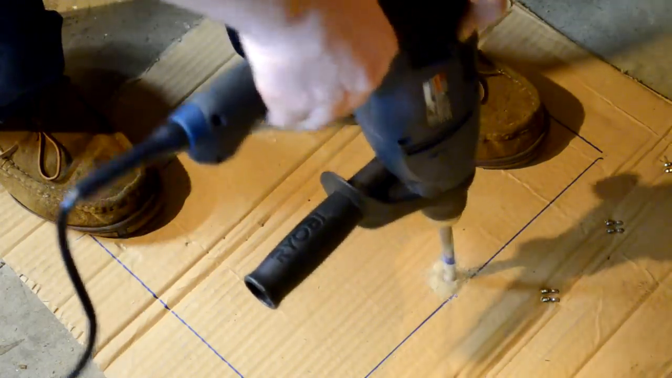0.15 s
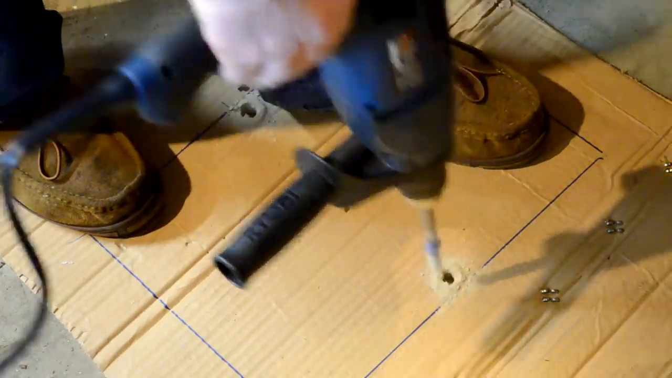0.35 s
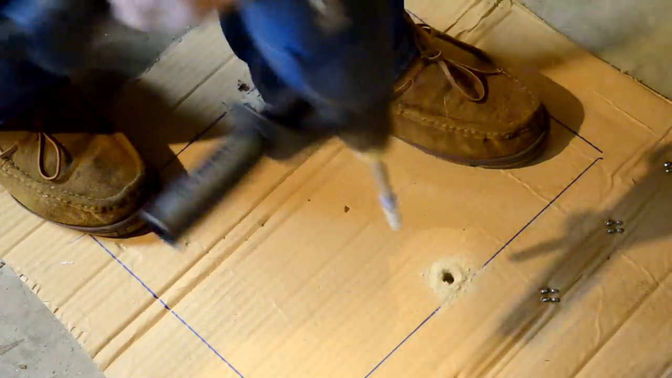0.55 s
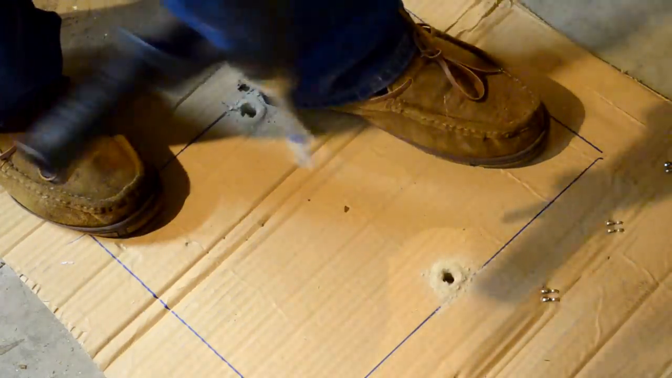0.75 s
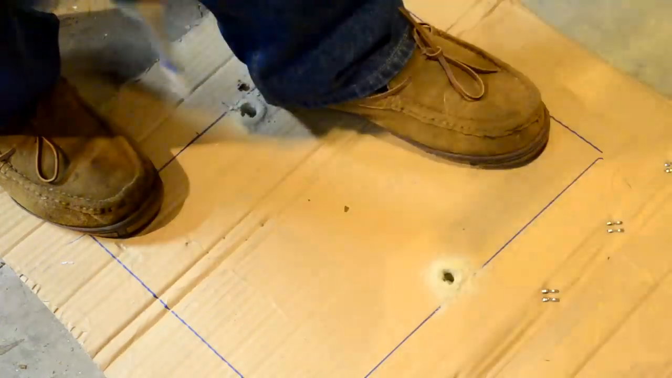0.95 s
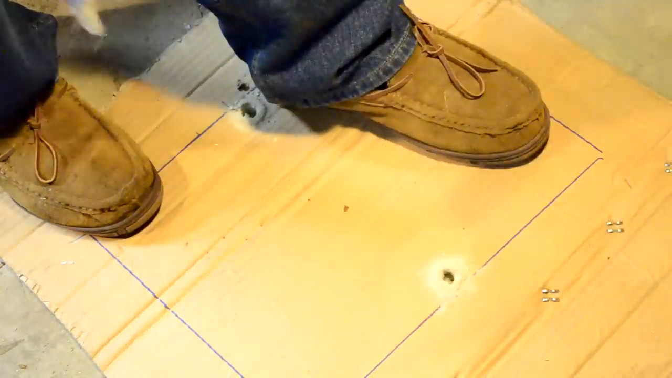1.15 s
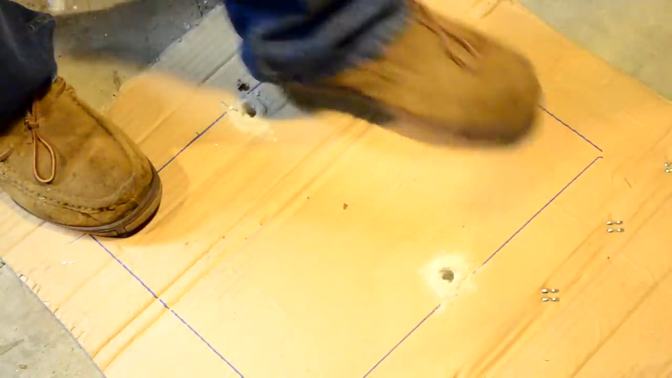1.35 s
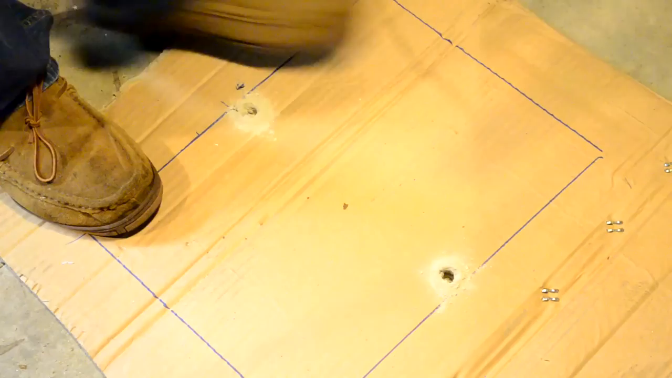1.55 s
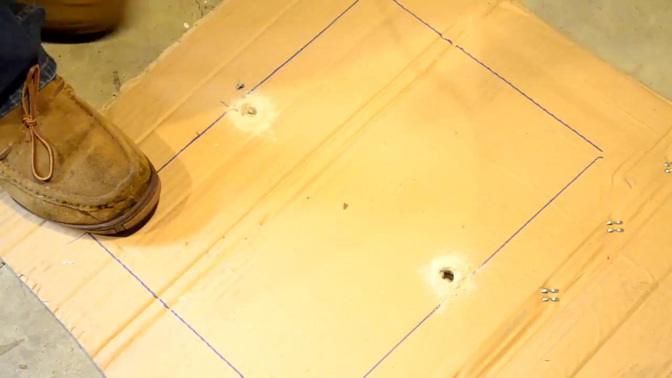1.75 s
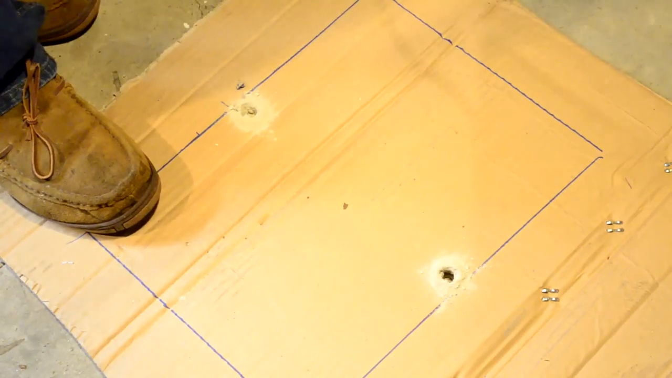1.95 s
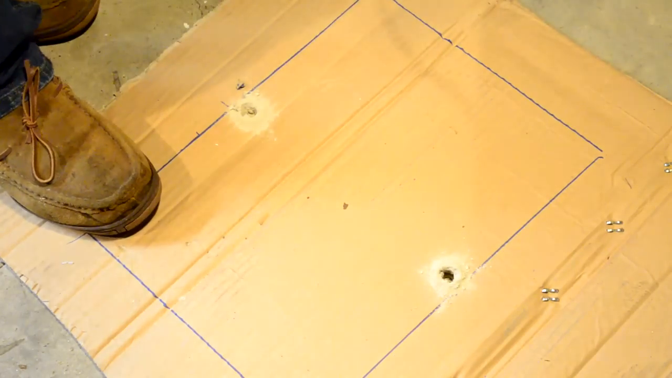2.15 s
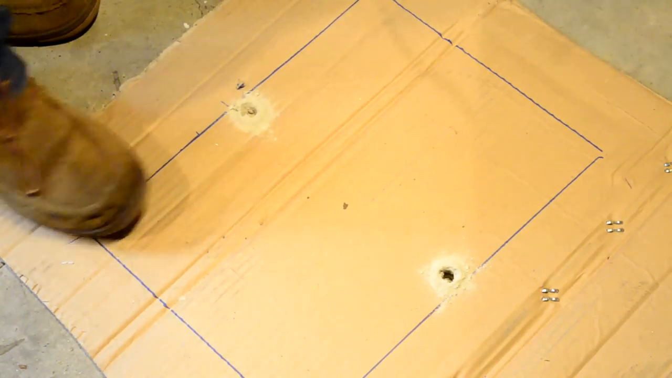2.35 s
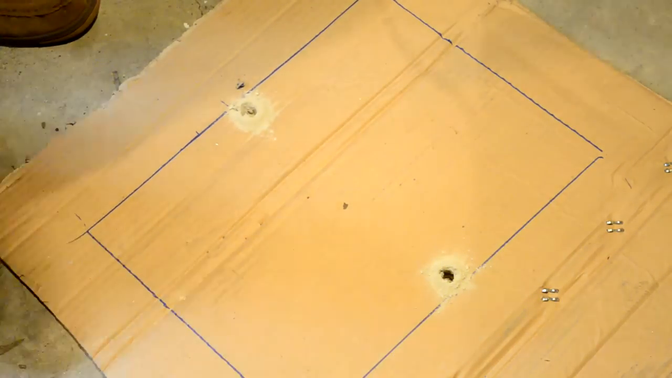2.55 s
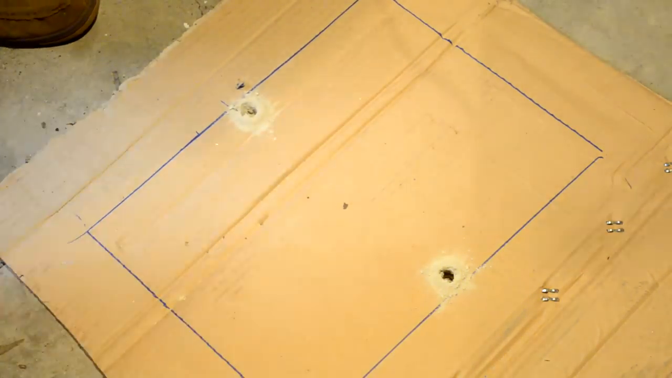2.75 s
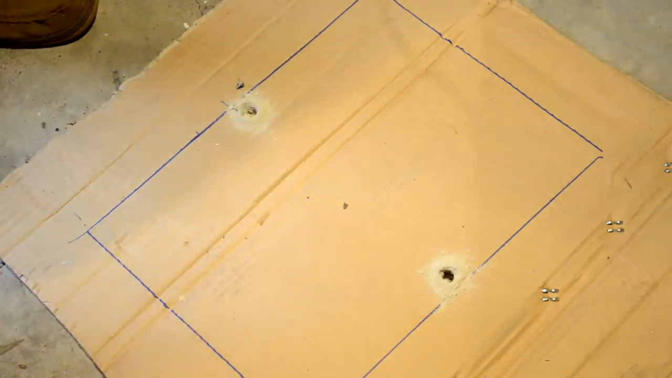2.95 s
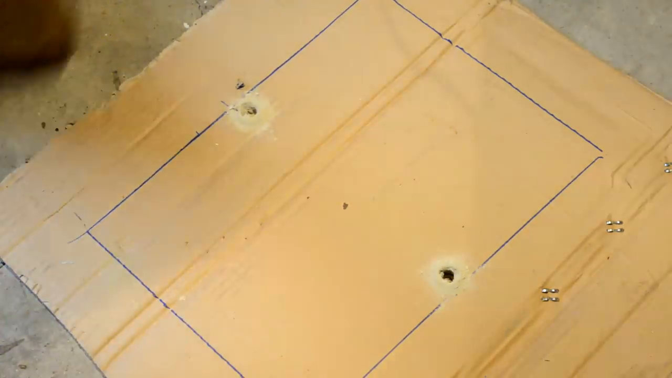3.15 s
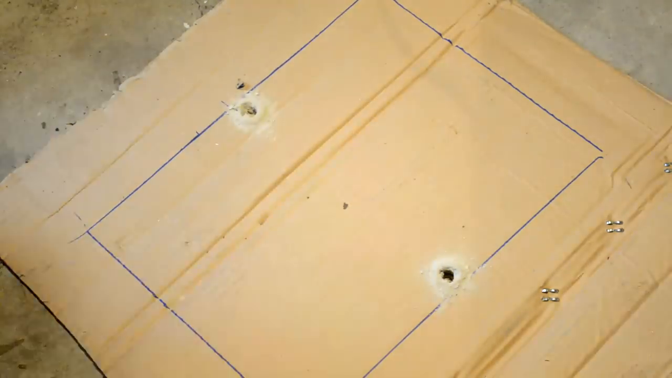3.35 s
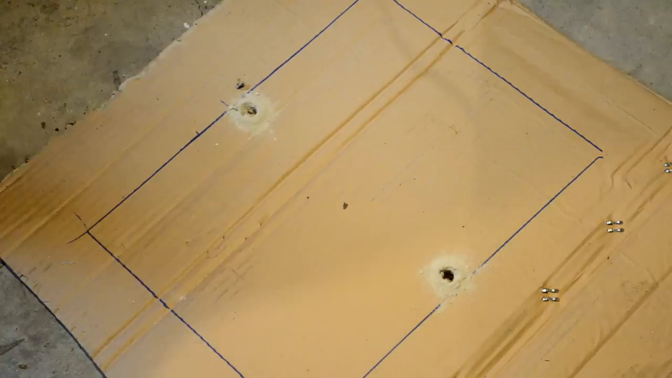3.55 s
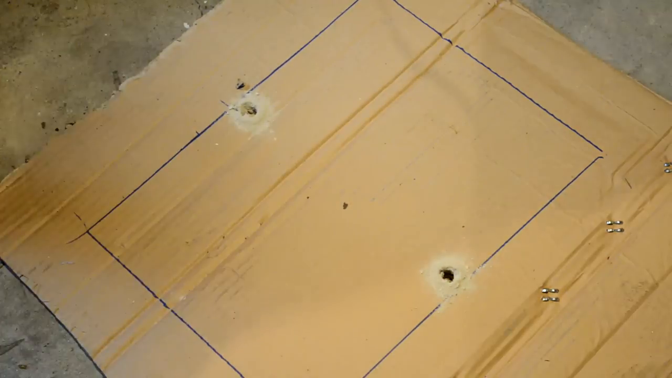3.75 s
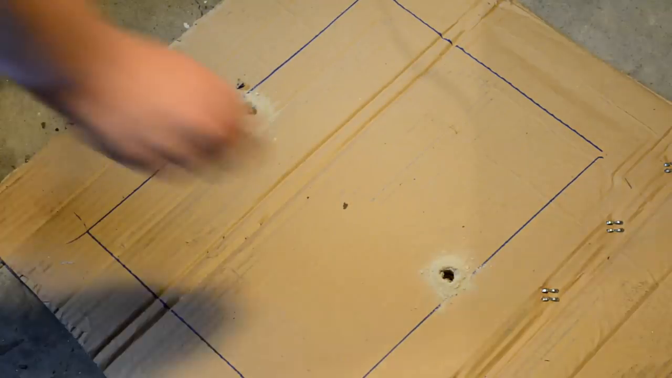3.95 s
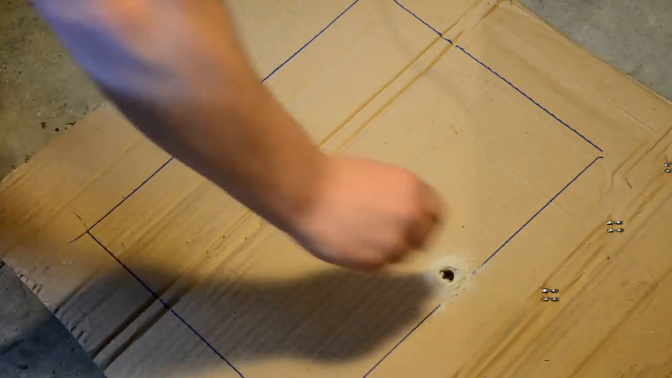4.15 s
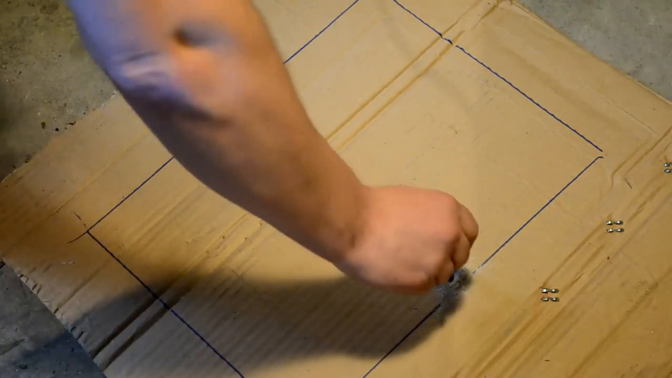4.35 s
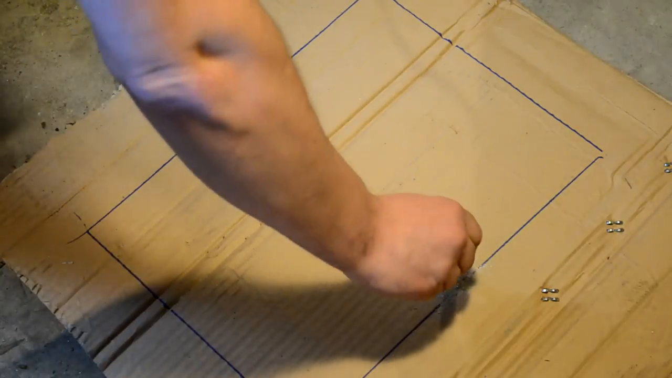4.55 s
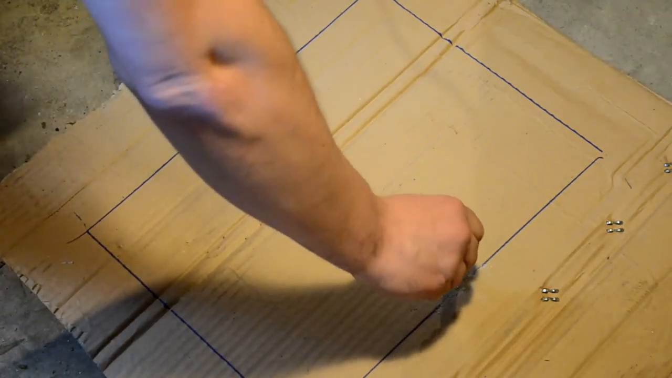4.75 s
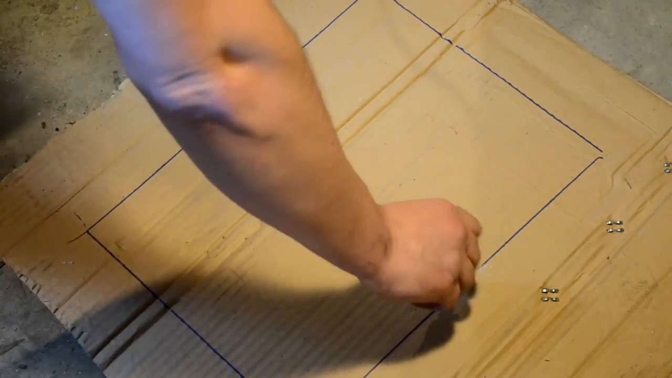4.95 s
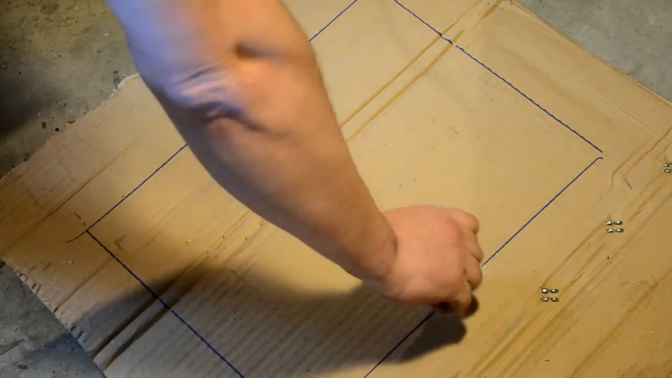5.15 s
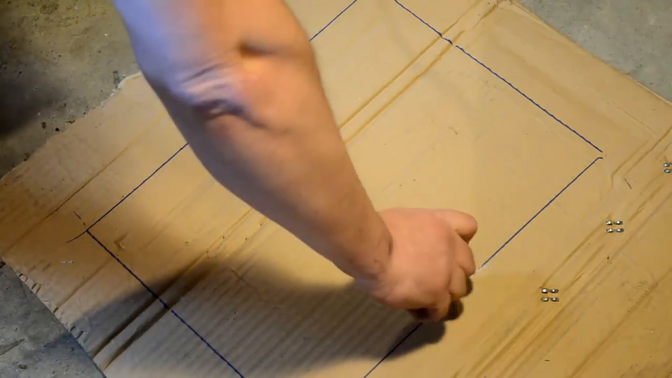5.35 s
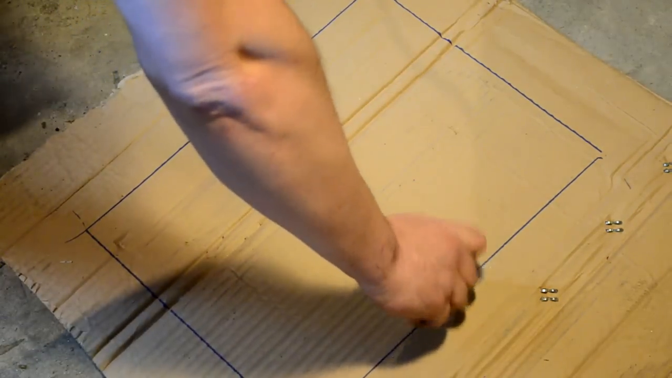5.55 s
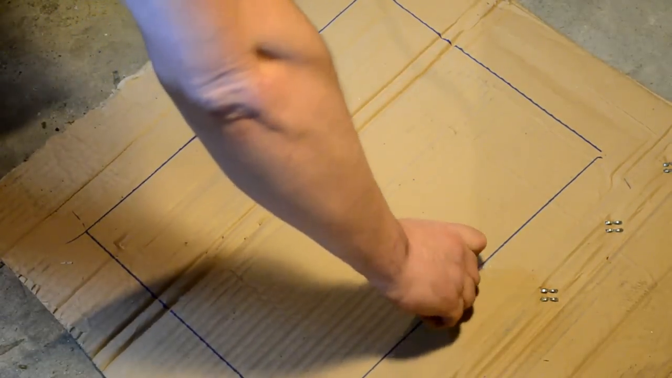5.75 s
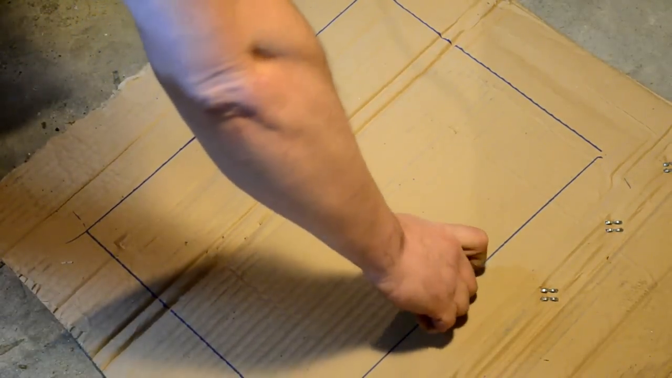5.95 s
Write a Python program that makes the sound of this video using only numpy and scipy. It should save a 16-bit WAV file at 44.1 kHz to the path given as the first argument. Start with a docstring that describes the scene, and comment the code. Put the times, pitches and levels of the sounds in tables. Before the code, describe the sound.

Sinking whine and gear rattle of a drill coasting to rest, soft footfalls on a cardboard sheet, then short scratchy finger strokes.

```python
"""A corded drill is let go, lifted from its hole in a concrete floor and coasts to a stop: rotor speed drives
gear rattle (noise burst per tooth), fan rush (noise) and the sinking commutator whine (sines).
Shoes shuffle on a cardboard sheet (damped thumps, resonant knocks, scuffs, squeaks); clothes rustle (noise);
then fingers brush the dust round the hole (grainy noise through the sheet's resonances).
Steady sines and dark noise make the mains hum and still air of the small workshop."""
import sys
import numpy as np
from scipy import signal
from scipy.io import wavfile
from scipy.ndimage import uniform_filter1d

SR = 44100
rng = np.random.default_rng(int(sys.argv[2]) if len(sys.argv) > 2 else 0)


def waveform_to_disk(signal):
    """Save audio, clipped to [-1, 1], as 16-bit WAV at the path in sys.argv[1]."""
    frames = np.transpose(np.atleast_2d(signal))
    scaled = np.clip(frames, -1, 1) * 32767
    samples = np.round(scaled).astype(np.int16)
    wavfile.write(sys.argv[1], SR, samples)


N = 264159
TIME = np.arange(N) / SR
CUTOFF_HZ = 15650


def from_db(db):
    """Decibels to gain."""
    return 10 ** (np.asarray(db) / 20)


def rms_one(x):
    """Scale to unit power."""
    return x / np.sqrt(np.mean(x ** 2) + 1e-20)


def drift(rate_hz):
    """Slow random wander, spread 1: twice low-passed noise, computed at every 40th sample."""
    step = 40
    r = np.exp(-2 * np.pi * rate_hz * step / SR)
    white = rng.standard_normal(N // step + 2002)
    slow = signal.lfilter([1], [1, -2 * r, r * r], white)[2000:]  # skip the filter's start
    return np.interp(np.arange(N) / step, np.arange(len(slow)), rms_one(slow))


def band(x, low_hz, high_hz):
    """Butterworth band-pass."""
    edges_hz = [low_hz, min(high_hz, .45 * SR)]
    return signal.sosfilt(signal.butter(2, edges_hz, "band", fs=SR, output="sos"), x + 1e-18)


def high_pass(x, hz, order):
    """Butterworth high-pass."""
    return signal.sosfilt(signal.butter(order, hz, "high", fs=SR, output="sos"), x + 1e-18)


def coloured_noise(spectrum):
    """Roughly third-octave noise bands laid along a spectrum; rms 1."""
    hz, db = np.transpose(spectrum)
    edge_count = int(3 * np.log2(hz[-1] / hz[0])) + 3
    edges_hz = np.geomspace(max(hz[0], 15), min(hz[-1], 17000), edge_count)
    white = rng.standard_normal((2, N))  # neighbouring bands take different noise
    out = np.zeros(N)
    for k, (low, high) in enumerate(zip(edges_hz, edges_hz[1:])):
        band_db = np.interp(np.log(low * high) / 2, np.log(hz), db)
        out += from_db(band_db) * band(white[k % 2], low, high)
    return rms_one(out)


def body(x, peaks, direct_db):
    """Resonances standing out of a broad response, at unchanged power."""
    out = from_db(direct_db) * x
    for hz, width_hz, db in peaks:
        r = np.exp(-np.pi * width_hz / SR)
        zeros = np.array([1, 0, -1]) * (1 - r * r) / 2
        poles = [1, -2 * r * np.cos(2 * np.pi * hz / SR), r * r]
        out = out + from_db(db) * signal.lfilter(zeros, poles, x)
    return rms_one(out) * np.std(x)


def bursts(hits, spread_db, decay_s, bed):
    """Envelope of uneven little impacts over a steady bed; power levelled to about 1."""
    sizes = hits * from_db(spread_db * np.clip(rng.standard_normal(N), -2, 2))
    power = signal.lfilter([1], [1, -np.exp(-2 / (decay_s * SR))], sizes ** 2 + 1e-18)
    levelled = power / (uniform_filter1d(power, size=6000) + 1e-9)
    return np.sqrt((levelled + bed) / (1 + bed))


def swell(start_s, length_s, attack_s, t60_s):
    """Rise, hold until the length is over, then fall 60 dB per t60."""
    late_s = TIME - start_s
    rise = np.clip(late_s / max(attack_s, .001), 0, 1)
    return rise * from_db(-60 * np.clip((late_s - length_s) / t60_s, 0, 3))


def swells(rows, t60_s):
    """Joint envelope, summed in power, of events that share one release."""
    return np.sqrt(sum((from_db(db) * swell(s, length_s, attack_s, t60_s)) ** 2
                       for s, length_s, db, attack_s in rows))


# hum partials: f/Hz, level/dB
HUM = [(107.7, -94.5), (597.5, -73), (721.4, -66.5), (899.0, -84), (1200, -82), (1443, -80.5)]
# still air: f/Hz, relative density/dB per Hz
AMBIENCE = [(15, -43.5), (25, -13), (43, -12), (233, -10), (495, -12.5), (598, -13.5), (648, -15),
            (722, 5.5), (782, -9.5), (1450, -14), (2290, -20), (2620, -20), (5730, -38), (12200, -39),
            (15500, -59)]
AMBIENCE_DB = -63.5
LOW_HUM_DB, LOW_HUM_HZ = -75.5, 110.4


def background():
    """Still air, slightly wavering mains hum and a soft low hum that swells for a moment."""
    out = from_db(AMBIENCE_DB) * coloured_noise(AMBIENCE)
    for hz, db in HUM:
        level = np.sqrt(2) * from_db(db + 0.53 * drift(3.6))
        out += level * np.sin(2 * np.pi * hz * TIME + 0.16 * drift(5))
    low_hum = np.sqrt(2) * np.sin(2 * np.pi * LOW_HUM_HZ * TIME + 0.57 * drift(5.8))
    envelope = swell(start_s=4.2, length_s=.56, attack_s=0.066, t60_s=.4)
    return out + from_db(LOW_HUM_DB) * envelope * low_hum


def slide():
    """Pressure of a sole sliding back over the cardboard."""
    return swell(start_s=2.73, length_s=0.43, attack_s=0.2, t60_s=.6)


# cloth moves: start t/s, length/s, level/dB, attack/s
RUSTLES = [(1.95, 0.49, -70.5, 0.053), (2.6, 0.21, -62, 0.1), (2.88, 0.59, -68.5, 0.073),
           (3.55, 0.54, -64, 0.44), (3.85, 0.44, -63, .19)]
# cloth: f/Hz, relative density/dB per Hz
SLEEVE = [(590, -40), (1000, -1.5), (1410, -0.5), (1640, -2), (1730, -1), (1840, -1), (6330, -19.5),
          (12200, -25.5), (14100, -26), (15500, -39)]
RUSTLE_T60_S, SLIDE_HISS_DB = 0.63, -62


def clothes():
    """Cloth and a sole slide as the body turns and the arm reaches down: noise in fine folds."""
    folds = bursts(rng.random(N) < 300 / SR, spread_db=9.0, decay_s=0.0017, bed=3.0)
    cloth = swells(RUSTLES, RUSTLE_T60_S) * coloured_noise(SLEEVE)
    hiss = rms_one(band(rng.standard_normal(N), 1340, 1600))
    return folds * (cloth + from_db(SLIDE_HISS_DB) * slide() * hiss)


# sole and sheet: start t/s, length/s, start f/Hz, end f/Hz, reference level/dB (peak about 12 dB above)
SQUEAKS = [(3.217, 0.028, 756, 790, -54), (3.815, 0.0082, 1720, 1710, -50.5),
           (4.64, 0.027, 900, 950, -65.5)]


def squeaks():
    """Brief stick-slip chirps, gliding a little."""
    out = np.zeros(N)
    for s, length_s, start_hz, end_hz, db in SQUEAKS:
        along = np.clip((TIME - s) / length_s, 0, 1)
        phase = 2 * np.pi * np.cumsum(start_hz + (end_hz - start_hz) * along) / SR
        envelope = np.interp(along, [0, .08, .6, 1], [0, 4.0, 2.0, 0.036])
        out += from_db(db) * envelope * (np.sin(phase) + 0.075 * np.sin(2 * phase))
    return out


# cardboard resonances: f/Hz, width/Hz, relative level/dB
SHEET_MODES = [(290, 130, -14), (384, 100, -0.5), (565, 28, 11), (916, 23, 6), (1075, 34, 9),
               (1180, 100, -4), (1494, 120, -2), (1586, 72, -1), (1920, 34, -15.5), (2980, 230, -1),
               (3430, 150, -17), (3800, 130, -1)]


def cardboard(x, direct_db):
    """The sheet resonates under whatever touches it."""
    return body(x, SHEET_MODES, direct_db)


# finger strokes: start t/s, length/s, level/dB, attack/s
STROKES = [(4.838, 0.041, -41.5, 0.026), (4.89, 0.04, -51.5, 0.0091), (4.944, 0.031, -46.5, 0.0036),
           (4.975, 0.049, -50, .015), (5.036, .014, -51, .008), (5.061, .008, -42.5, 0.0026),
           (5.084, 0.011, -46.5, .004), (5.126, .012, -52, .006), (5.174, 0.031, -47.5, 0.0086),
           (5.228, 0.0083, -37.5, 0.0065), (5.398, 0.0078, -48, 0.006), (5.571, 0.026, -33, 0.005),
           (5.703, .035, -43.5, 0.0054), (5.739, 0.046, -34, .004), (5.8, 0.05, -48.5, .01),
           (5.887, 0.016, -43.5, .005), (5.96, .04, -44.5, 0.027)]
# gritty shoe scuffs: start t/s, length/s, level/dB, attack/s
SCUFFS = [(1.825, 0.019, -55, .008), (2.195, 0.043, -69.5, 0.035), (2.36, 0.039, -67, 0.026),
          (3.232, 0.0096, -61.5, 0.009)]
# rubbed dust: f/Hz, relative density/dB per Hz
BRUSHING = [(71, -53), (120, -3), (312, -14.5), (390, -10.5), (508, -5), (586, -22), (676, -0.5),
            (1080, 1.5), (1620, -3), (2540, -12), (2810, -11.5), (3580, -20.5), (7760, -24.5), (13200, -39),
            (15500, -63)]
STROKE_T60_S, SCUFF_T60_S = 0.14, 0.1
SCUFF_GRIT_DB, SLIDE_RUB_DB = 20, -67


def strokes():
    """Concrete dust grains roll under each stroke or scuff and sound through the cardboard."""
    fingers = swells(STROKES, STROKE_T60_S)
    shoes = swells(SCUFFS, SCUFF_T60_S)
    push = fingers + shoes + from_db(SLIDE_RUB_DB) * slide()
    grit = fingers + from_db(SCUFF_GRIT_DB) * shoes  # treble is stronger under shoes
    grains = bursts(rng.random(N) < 450 / SR, spread_db=1.5, decay_s=0.0018, bed=0.8)
    rub = high_pass(cardboard(grains * coloured_noise(BRUSHING), direct_db=3.0), hz=126, order=4)
    dull = signal.sosfilt(signal.butter(1, 3000, fs=SR, output="sos"), rub)
    return push * dull + grit * (rub - dull)


def knocks(rows, t60_s, fall_db_per_octave):
    """Contact = sharp click + short shudder, in five registers weakening away from its centre."""
    out, t = np.zeros(N), TIME[:SR // 4]
    registers_hz = [(160, 440), (380, 1040), (1200, 1850), (2900, 4100), (5000, 10000)]
    for s, db, centre_hz in rows:
        shudder = rng.standard_normal(len(t)) * from_db(-60 * t / t60_s)
        shudder[0] += 12.5  # click
        start = round(s * SR)
        for low, high in registers_hz:
            part = band(shudder, low, high)
            part /= np.std(part[:SR // 50])
            octaves = abs(np.log2(np.sqrt(low * high) / centre_hz))
            level = from_db(db - fall_db_per_octave * octaves)
            out[start:start + len(t)] += (level * part)[:N - start]
    return high_pass(cardboard(out, direct_db=5.5), hz=113, order=2)


# contacts: t/s, level/dB, centre f/Hz (higher = harder)
TAPS = [(1.999, -60.5, 4500), (2.2, -69, 6500), (2.324, -69, 8000), (2.548, -58, 1200), (2.774, -55, 3400),
        (3.377, -67, 3000), (3.46, -58.5, 1400), (3.61, -61, 3080), (3.816, -46.5, 1840), (3.839, -52, 210),
        (3.891, -46.5, 970), (3.949, -55, 1210), (3.971, -41.5, 386), (4.193, -36, 910), (4.194, -52, 3550),
        (4.758, -57.5, 800), (5.241, -42, 1446), (5.374, -42, 670), (5.514, -48.5, 750),
        (5.571, -41.5, 400), (5.74, -46.5, 540)]


def taps():
    """Fingers, shoes and crumbs of concrete tap the cardboard."""
    return knocks(TAPS, t60_s=0.098, fall_db_per_octave=12)


# shoes set down: t/s, thump level/dB, ring f/Hz, sheet knock level/dB
FOOTFALLS = [(1.014, -27.5, 202, -48), (1.826, -35.5, 167.4, -43), (1.885, -45, 153, -50),
             (2.894, -37, 250, -46.5), (2.969, -42, 153, -48)]
FOOT_KNOCK_HZ, THUMP_T60_S = 620, 0.062


def footfalls():
    """Soft sole knocks the sheet and drives air from under it: low damped thump with two overtones."""
    contacts = [(s, knock_db, FOOT_KNOCK_HZ) for s, _, _, knock_db in FOOTFALLS]
    out = knocks(contacts, t60_s=0.21, fall_db_per_octave=8.5)
    for s, db, hz, _ in FOOTFALLS:
        t = np.maximum(TIME - s, 0)
        thump = (1 - np.exp(-t / 0.0056)) * from_db(np.maximum(db - 60 * t / THUMP_T60_S, -200))
        ring = np.sin(2 * np.pi * hz * t)
        ring += 0.67 * np.sin(2 * np.pi * 1.42 * hz * t)
        ring += np.sin(2 * np.pi * 2.33 * hz * t)
        out += thump * ring
    return out


STOP_S, FRICTION_HZ_PER_S = 1.9911, 123.33
DRAG_HZ = 306.79  # speed at which air drag equals friction


def rotor_speed():
    """Turns per second under constant friction and air drag (square of the speed)."""
    return DRAG_HZ * np.tan(np.maximum(STOP_S - TIME, 0) * FRICTION_HZ_PER_S / DRAG_HZ)


def running(spectrum, speed, full_db, power, slack_db):
    """Noise that falls with a power of the speed, down to the rattle of loose parts."""
    return np.hypot(from_db(full_db) * speed ** power, from_db(slack_db)) * coloured_noise(spectrum)


# low gear-case rumble, gears, housing: f/Hz, relative density/dB per Hz
RUMBLE = [(120, -34.5), (200, -18.5), (260, -9.5), (310, -14.5), (350, -2.5), (480, -3.5), (560, 2.5),
          (640, 1), (800, -26.5)]
GEARS = [(450, -23), (620, -7), (730, -2), (810, 0), (1100, 2.5), (1400, 2.5), (1730, -5), (2200, -21),
         (2860, -36)]
HOUSING = [(1060, -28.5), (1800, 2), (2290, -2), (2480, 0.5), (2830, -2.5), (3120, 2.5), (3970, -12),
           (4310, -16), (4800, -14.5), (6240, -43), (10600, -120)]
# narrow peaks that colour the rattle: f/Hz, width/Hz, relative level/dB
RATTLE_PEAKS = [(385, 100, -3.5), (553, 22, -10.5), (670, 22, 1), (760, 28, -2), (934, 24, 0),
                (1067, 10, -5), (1124, 7.5, 2.5), (1114, 15, -1.5), (1326, 36, -8), (1443, 17, 1.5),
                (1577, 7.3, -7), (1800, 19, -19.5), (2370, 20, -8.5), (2435, 39, -4), (2860, 17, -7.5),
                (3100, 38, -13), (3985, 42, 10.5)]
BIT_OUT_S, BIT_CHATTER_DB, BIT_T60_S = .16, 1, 0.084


def gear_rattle(speed, teeth):
    """Unloaded teeth knock in their backlash, each differently; the bit chatters in its hole at first."""
    clatter = bursts(teeth, spread_db=3.0, decay_s=0.0021, bed=0.91)
    rattle = running(RUMBLE, speed, full_db=-32, power=1.57, slack_db=-68.5)
    rattle += running(GEARS, speed, full_db=-16.5, power=1.984, slack_db=-46.5)
    rattle += running(HOUSING, speed, full_db=-20.5, power=1.96, slack_db=-44.5)
    rattle *= from_db(BIT_CHATTER_DB * swell(0, BIT_OUT_S, 0, BIT_T60_S))
    return body(clatter * rattle, RATTLE_PEAKS, direct_db=4.5)


# fan: f/Hz, relative density/dB per Hz
FAN = [(2470, -28), (4200, 3.5), (4740, -2.5), (5340, 0), (5830, -2), (7210, -4), (8870, -3), (9950, -8.5),
       (11700, -10), (14100, -22.5), (15500, -27)]


def fan_rush(speed, teeth):
    """Air noise of the fan, lightly roughened at the tooth rate."""
    roughness = bursts(teeth, spread_db=3.0, decay_s=.001, bed=2.6)
    return roughness * running(FAN, speed, full_db=-28, power=1.93, slack_db=-75)


def housing_drone():
    """Low narrow-band drone of the housing as the rotor slows."""
    envelope = swell(start_s=0.98, length_s=0.14, attack_s=0.042, t60_s=1.55)
    return from_db(-51.5) * envelope * rms_one(band(rng.standard_normal(N), 261, 284))


BARS, FAN_BLADES, PINION_TEETH = 24, 37, 5
# housing radiation of tones: f/Hz, gain/dB
RADIATION = [(1700, -6.5), (2060, -12.5), (2450, -1.5), (3000, -2.5), (3600, -8.5), (4150, -8),
             (4650, -12.5), (5100, -7.5), (5800, -12.5), (6600, -15.5), (7400, -13.5), (9300, -23),
             (10300, -21), (11300, -16), (13500, -27.5), (15500, -26.5)]


def rotor_tone(rotor_hz, turns, multiple, full_db, power):
    """Rotor harmonic, fluttering quickly and irregularly, swelling as it sinks through radiation peaks."""
    hz = multiple * rotor_hz
    speed = rotor_hz / rotor_hz[0]
    smear = .22 * multiple / BARS * drift(70)  # brush chatter, stronger the higher the tone
    phase = 2 * np.pi * multiple * turns + .2 * np.sin(2 * np.pi * turns) + smear
    flutter = from_db(2.4 * drift(40) + 1.6 * drift(10))
    points_hz, gain_db = np.transpose(RADIATION)
    radiation_db = np.interp(np.log(hz + 1), np.log(points_hz), gain_db)
    level = np.sqrt(2) * from_db(full_db + radiation_db) * speed ** power * flutter
    return level * np.sin(phase) * (hz < CUTOFF_HZ)


# partials: multiple of the bar rate
WHINE_MULTIPLES = [1, 2, 2.5, 3, 3.5, 4, 4.5, 5, 6]
# same partials: level/dB re WHINE_DB
WHINE_LEVELS_DB = [0, -3, -13, -12, -12, -10, -22, -10, -9]
# lowest tone fades and returns as the drill is swung away: t/s, gain/dB
WHINE_SWING = [(.5, 0), (.62, -7), (.78, -6), (.88, -2), (1.02, 1), (1.22, -0.5), (1.36, -4), (1.6, -3)]
WHINE_DB, WHINE_POWER = -23.5, 0.82  # at full speed, before radiation
WHINE_DIES_BELOW = 0.23  # share of full speed


def commutator_whine(rotor_hz, turns):
    """Bars passing the brushes whine at the bar rate, its multiples and some half-way between."""
    bar_tone, *overtones = [rotor_tone(rotor_hz, turns, k * BARS, WHINE_DB + db, WHINE_POWER)
                            for k, db in zip(WHINE_MULTIPLES, WHINE_LEVELS_DB)]
    whine = from_db(np.interp(TIME, *np.transpose(WHINE_SWING))) * bar_tone + sum(overtones)
    return whine * np.minimum(rotor_hz / rotor_hz[0] / WHINE_DIES_BELOW, 1) ** 2


DIES_BELOW = 0.095  # share of full speed


def drill():
    """Rotor speed sets tooth clatter, tones and running levels; friction and drag bring it to rest."""
    rotor_hz = rotor_speed()
    speed = rotor_hz / rotor_hz[0]
    turns = np.cumsum(rotor_hz * (1 + .0015 * drift(25))) / SR
    teeth = np.diff(np.floor(PINION_TEETH * turns + .3 * drift(300)), prepend=0) > 0
    noise = gear_rattle(speed, teeth) + fan_rush(speed, teeth) + housing_drone()
    noise = high_pass(noise, hz=147, order=4)  # keeps the drill noise free of low rumble
    blade_tone = rotor_tone(rotor_hz, turns, FAN_BLADES, full_db=-18.5, power=3.5)
    total = noise + commutator_whine(rotor_hz, turns) + blade_tone
    return total * np.minimum(speed / DIES_BELOW, 1) ** 1.21


ROOM_T60_S, TREBLE_T60_S, ROOM_DB = .26, 0.2, -5.5


def workshop(x):
    """Direct sound plus dense reflections; the treble dies first."""
    t = TIME[:SR // 2]
    noise = rng.standard_normal(len(t))
    tail = band(noise, 58, 5800) * from_db(-60 * t / ROOM_T60_S)
    tail += 1.3 * band(noise, 4500, 22000) * from_db(-60 * t / TREBLE_T60_S)
    tail *= t > .003
    tail /= np.sqrt(np.sum(tail ** 2) * 2)
    room = from_db(ROOM_DB)
    return (x + room * signal.fftconvolve(x, tail)[:N]) / np.sqrt(1 + room ** 2)


def scene():
    """Drill, shoes, hands and clothes sound in the workshop, over its background."""
    sources = clothes() + squeaks() + strokes() + taps() + footfalls() + drill()
    return (background() + workshop(sources))[None]


def record(dry):
    """Steep low-pass at the top."""
    return signal.sosfilt(signal.ellip(12, .1, 90, CUTOFF_HZ, fs=SR, output="sos"), dry)


dry = scene()
out = record(dry)
waveform_to_disk(out)
```